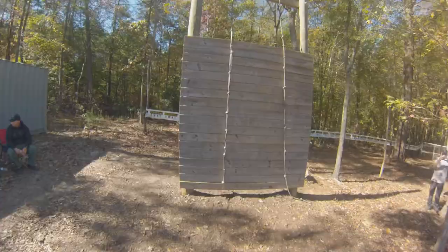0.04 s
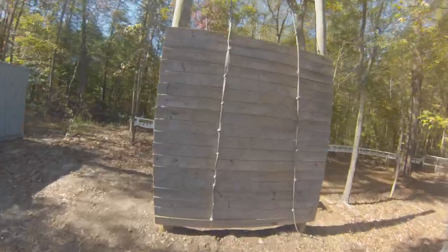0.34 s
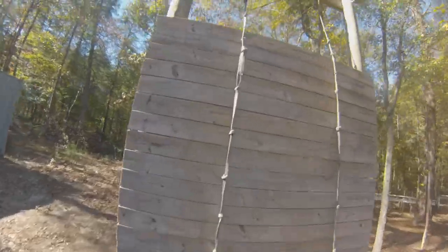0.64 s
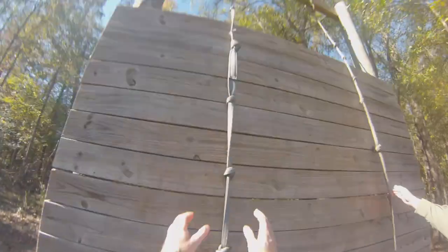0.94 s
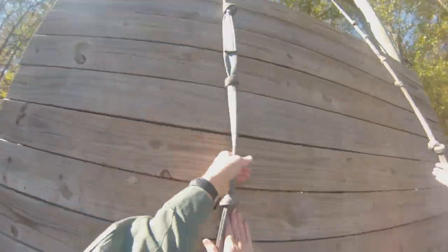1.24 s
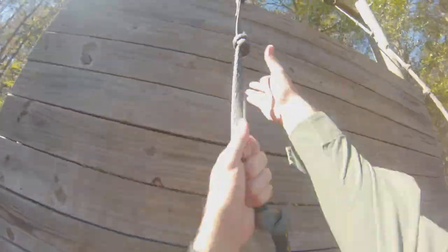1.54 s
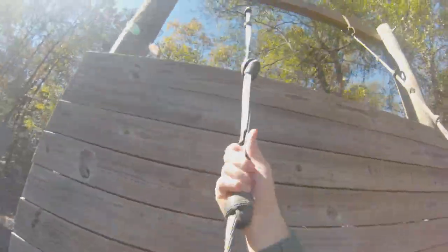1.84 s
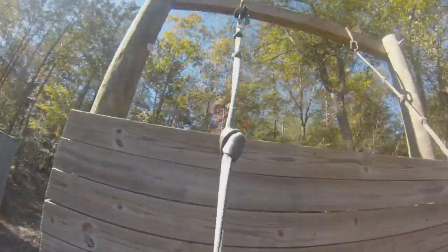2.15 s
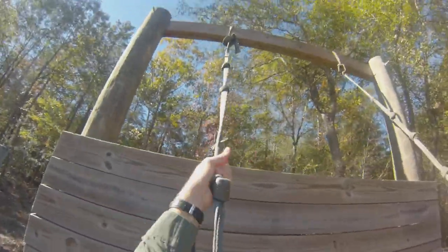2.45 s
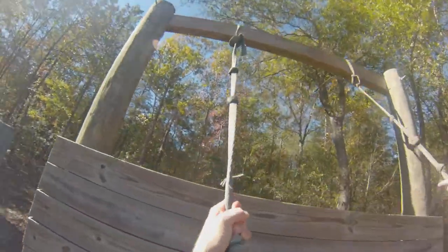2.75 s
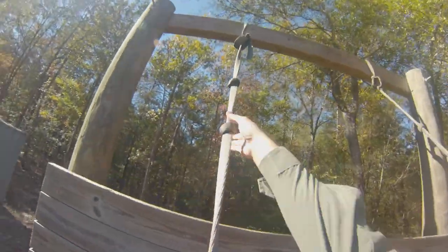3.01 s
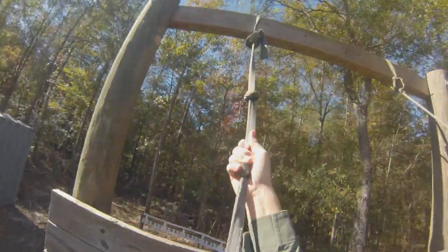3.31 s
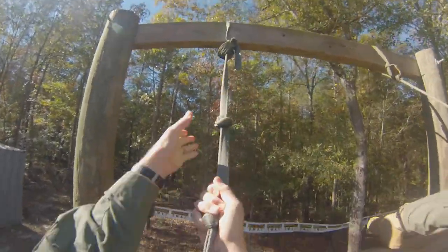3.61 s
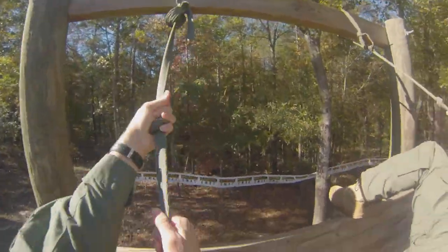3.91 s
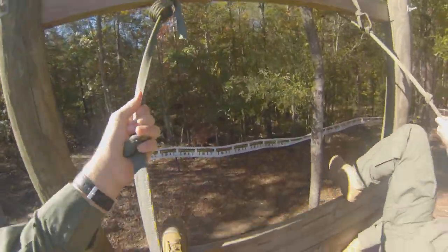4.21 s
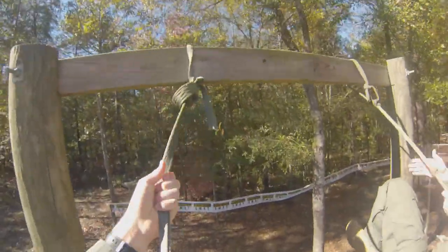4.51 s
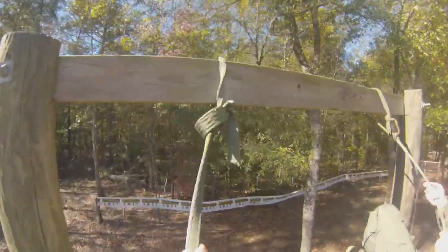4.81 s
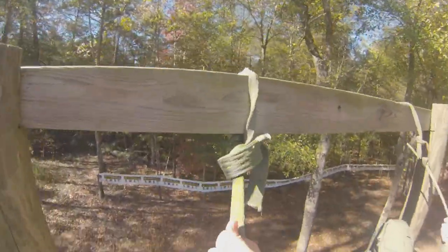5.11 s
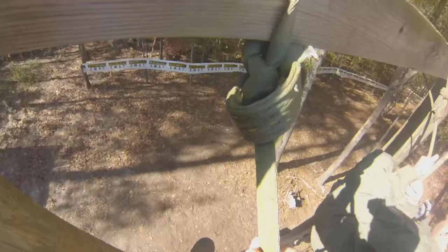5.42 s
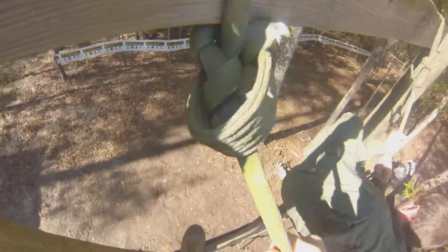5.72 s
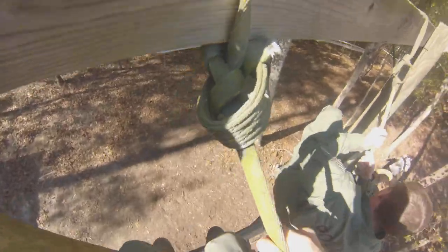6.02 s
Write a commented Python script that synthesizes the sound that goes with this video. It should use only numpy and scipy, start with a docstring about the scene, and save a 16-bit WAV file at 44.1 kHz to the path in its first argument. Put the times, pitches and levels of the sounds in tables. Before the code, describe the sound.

Low wind rumbles on a body-worn microphone throughout, outdoors with no echo, with very faint, rapid high pips behind it that pause around 3 to 4.4 seconds. In the first second a climber runs up with light taps and low pushes of air. From about 0.9 seconds a strap scrapes and a buckle knocks, and at 1 second the climber hits a plank wall: a sharp plastic crack with a deep thump, by far the loudest moment, leaving a faint, thin metallic ring. Jacket rustle, ticks and smaller knocks follow busily until about 2.2 seconds. The climb continues more quietly, with uneven cloth rubbing and occasional clicks. Dry boot taps on wood cluster between 4.2 and 4.8 seconds and return near 5.8. The rope gives a few tiny squeaks from 4.5 to 6 seconds, and rustling and wind last to the end, just after 6 seconds.

```python
"""Low wind rumbles first, with faint high pips behind it. A climber wearing a camera runs at a plank
wall, lands on it with a thump about a second in, and hauls up a rope. Each jolt pushes air at the
microphone, and the hard landing clacks the camera's plastic housing and sets a metal fitting ringing.
Jacket and strap rub on the housing, boots tap the planks, the rope squeaks and gear ticks."""
import sys
import numpy as np
from scipy import signal
from scipy.fft import rfft, irfft, next_fast_len
from scipy.io import wavfile
from scipy.ndimage import map_coordinates

SR = 44100
rng = np.random.default_rng(int(sys.argv[2]) if len(sys.argv) > 2 else 0)


def file_out(sig):
    """Save sig as 16-bit WAV at sys.argv[1]."""
    # one column per channel
    cols = np.atleast_2d(sig).T
    # limit, then scale
    lim = np.clip(cols, -1, 1)
    pcm = np.round(lim * 32767).astype(np.int16)
    wavfile.write(sys.argv[1], SR, pcm)


N = 275819

# Wind at the microphone. Each row: time in seconds, level in dB.
WIND_LEVELS = [(0.0, -35.5), (0.15, -38.5), (0.27, -51), (0.54, -33.5), (0.65, -48), (0.8, -34),
               (1.6, -38.5), (2.5, -37), (3.5, -40), (4.8, -40), (5.1, -45), (5.25, -39), (5.6, -48),
               (5.8, -40), (6.25, -40)]
# The tone of each noise. Each row: frequency in Hz, relative level in dB.
RUMBLE_TONE = [(8, -14), (16, 2), (28, -4), (45, -5.5), (60, -15), (75, -25.5), (100, -35.5), (200, -55.5),
               (500, -96.5)]
AIR_TONE = [(60, 19), (150, 5), (300, 4), (600, 0), (950, -4.5), (1400, -2), (1900, -9), (2330, -5),
            (3000, -10), (5700, -10.5), (8500, -15), (10300, -11.5), (12500, -17.5), (13400, -28)]
RUSTLE_TONE = [(400, -26), (730, 0.5), (950, -12), (1400, 0), (1900, -6), (2330, -2), (2650, -9),
               (3000, -14.5), (3450, -18.5), (3850, -14.5), (4800, -26.5), (8000, -24), (12000, -38),
               (15000, -46.5)]
RUB_TONE = [(60, 3), (130, 5.5), (210, 0), (300, -1.5), (580, -7.5), (730, -9.5), (950, -35.5), (1800, -53)]
SCRAPE_TONE = [(70, -10), (150, 7.5), (260, 1.5), (580, 2), (730, 0), (950, -10.5), (1350, -4), (1900, -8),
               (2330, -3.5), (3000, -23), (3850, -24), (5000, -31), (12000, -40), (15000, -94.5)]
TICK_TONE = [(500, -30), (1500, 1), (2500, 0), (3900, 1.5), (6000, -12), (9000, -12), (14000, -29)]
# When the pips sound. Each row: start and end in seconds.
PIP_TIMES = [(0, 2.85), (4.37, 6.25)]
# The pitches in a pip. Each row: pitch in Hz, width in Hz, relative level in dB.
PIP_BANDS = [(5700, 400, -2), (10230, 900, -1), (12350, 500, -6)]
# How much the body stirs the jacket. Each row: time in seconds, relative level in dB.
BODY_EFFORT = [(0.0, -74), (0.65, -87.5), (0.78, -73.5), (0.87, -61), (1.03, -70), (1.27, -60.5),
               (1.38, -70.5), (1.6, -79), (2.1, -72), (2.9, -79.5), (3.8, -75), (4.1, -79), (4.65, -72),
               (5.05, -80.5), (6.25, -76.5)]
# Arm and leg moves. Each row: middle and half length in seconds, relative rustle and rub in dB.
LIMB_MOVES = [(0.467, 0.057, -75.5, -63.5), (1.12, .028, -63.5, -53), (1.209, .035, -63, -54),
              (1.318, 0.022, -59.5, -58), (1.478, 0.081, -66, -63), (1.661, 0.04, -66, -69),
              (1.767, 0.043, -68, -61.5), (1.906, 0.017, -70.5, -69), (2.096, 0.061, -65, -63),
              (2.2, 0.023, -70.5, -65), (2.415, .02, -66, -62), (2.481, .022, -67, -67.5),
              (2.594, 0.084, -69.5, -66.5), (2.73, 0.018, -75.5, -74), (3.069, 0.032, -70.5, -79),
              (3.192, 0.048, -76.5, -63), (3.349, 0.039, -70, -62), (3.522, 0.011, -80.5, -61.5),
              (3.83, 0.026, -75.5, -66), (4.073, 0.017, -91, -63.5), (4.224, 0.083, -71.5, -73),
              (4.382, 0.055, -72.5, -64), (4.661, 0.022, -78, -65.5), (4.758, 0.023, -73, -65.5),
              (4.823, 0.025, -73.5, -65.5), (5.193, 0.031, -73, -71.5), (5.495, 0.02, -69.5, -72),
              (5.744, 0.012, -76.5, -66.5), (5.976, 0.059, -71, -66.5), (6.255, 0.023, -64, -65)]
# Quick drags of the strap. Each row: middle in seconds, level in dB, half length in seconds.
STRAP_DRAGS = [(0.878, -41, 0.012), (0.927, -44, 0.014), (0.947, -53.5, 0.022), (0.982, -37, 0.0096),
               (1.113, -58.5, 0.0051), (1.125, -65, 0.0053), (1.187, -63, 0.0053), (2.648, -62, 0.0067),
               (3.134, -64.5, 0.011), (3.227, -65, 0.0067), (3.464, -63.5, 0.0082), (5.607, -64.5, 0.0045)]
# Small ticks of gear. Each row: start in seconds, peak in dB.
GEAR_TICKS = [(.1465, -49), (1.1109, -52), (1.122, -46), (1.2745, -53), (1.2775, -51), (1.7065, -60),
              (2.0662, -61), (4.2423, -62), (4.478, -62), (5.9328, -52)]
# The rope tightening. Each row: middle in seconds, level in dB, pitch in Hz, half length in seconds.
ROPE_SQUEAKS = [(4.535, -69, 1430, 0.0043), (5.334, -70.5, 1563, 0.0083), (5.3478, -55, 1513, 0.0045),
                (5.442, -63.5, 1426, 0.0028), (6.066, -68, 1340, 0.0037)]
# Taps on the planks. Each row: start in seconds, level in dB, pitch in Hz, seconds to fade by 60 dB.
PLANK_TAPS = [(0.1465, -54, 1630, 0.022), (0.269, -63.5, 2240, .08), (0.3674, -59, 2100, 0.022),
              (0.703, -66.5, 2204, 0.062), (2.802, -63, 1500, 0.075), (2.9554, -61.5, 1700, 0.028),
              (4.2427, -52.5, 1180, 0.026), (4.356, -58, 1940, 0.03), (4.4767, -51.5, 1480, 0.038),
              (4.5995, -54.5, 1130, .1), (4.762, -56, 1270, 0.068), (5.034, -71.5, 1240, .08),
              (5.261, -64.5, 2260, .026), (5.8139, -53.5, 1530, 0.055), (5.831, -61.5, 2240, 0.048),
              (6.066, -64, 1286, 0.081)]
# How the plastic housing rings. Each row: frequency in Hz, relative level in dB.
HOUSING_TONE = [(200, -14), (410, -3.5), (580, -15.5), (760, -7), (1100, 1.5), (1850, -2.5), (2280, 5),
                (2600, -1), (3000, -25.5), (4000, -15.5), (4650, -22.5), (5400, -33), (8200, -30),
                (14000, -44)]
# Knocks on the housing. Each row: start in seconds, clack level in dB, thud level in dB.
BUCKLE_KNOCKS = [(.8808, -28, -39), (.9045, -37, -39), (.9583, -38, -41), (1.087, -57, -47),
                 (1.1997, -44, -50), (1.2765, -44, -48), (1.5469, -51, -56), (1.706, -53, -62),
                 (1.8642, -55, -61), (2.0662, -53, -62), (2.1331, -58, -59), (2.205, -60, -53),
                 (3.4526, -55, -51), (3.5818, -57, -66), (4.422, -62, -56), (4.81, -59, -56),
                 (5.558, -62, -56)]
# Jolts of the body. Each row: middle in seconds, peak in dB, rough pitch in Hz.
BODY_JOLTS = [(0.458, -23, 21.7), (0.494, -20, 27.6), (0.819, -21.5, 26.8), (0.845, -20, 37.5),
              (0.884, -22, 39.4), (.902, -27, 41.7), (.936, -17.5, 24.4), (0.9822, -7, 47.3),
              (1.011, -25.5, 35.3), (1.101, -23.5, 28.8), (1.234, -22.5, 29.8), (1.318, -20, 26.9),
              (1.477, -25, 27.54), (2.081, -28, 23.9), (3.215, -27.5, 27.3), (4.4, -31, 24.1),
              (5.929, -30, 34)]
# The metal fitting's notes. Each row: pitch in Hz, level in dB, seconds to fade by 60 dB.
FITTING_NOTES = [(2700, -68, .5), (3550, -75.5, .6)]
# Meeting the wall. Two values: time of the blow in seconds, seconds until the housing bounces.
LANDING_TIMES = (.9745, .00134)


def amp(db):
    """Turn decibels into a gain."""
    return 10 ** (np.asarray(db) / 20)


def unit(x):
    """Scale a sound to an average (rms) level of 1."""
    return x / np.sqrt(np.mean(x ** 2) + 1e-20)


def clock():
    """The time of every sample, in seconds."""
    return np.arange(N) / SR


def curves(rows):
    """Join a table's rows with straight lines: one curve for each column after the time."""
    times, *columns = np.transpose(rows)
    return [np.interp(clock(), times, column) for column in columns]


def swell(middle, half):
    """A smooth rise and fall that reaches 1 at the middle time."""
    return np.exp(-((clock() - middle) / half) ** 2)


def wobble(rate):
    """A smooth curve through `rate` random points a second."""
    return map_coordinates(rng.standard_normal(int(N * rate / SR) + 4), [clock() * rate])


def filtered(x, response):
    """Multiply each frequency in a sound by response(hz)."""
    size = next_fast_len(len(x) + SR // 4)
    return irfft(rfft(x, size) * response(np.fft.rfftfreq(size, 1 / SR)), size)[:len(x)]


def tone_gain(hz, tone):
    """The gain a tone table gives at these frequencies."""
    points_hz, db = np.transpose(tone)
    return amp(np.interp(np.log(hz + 1), np.log(points_hz), db))


def coloured(x, tone):
    """Shape a sound with a tone table, at an average level of 1."""
    return unit(filtered(x, lambda hz: tone_gain(hz, tone)))


def resonance(f, hz, width):
    """A filter shape that favours the frequencies f near hz."""
    return 1j * f * width / (hz * hz - f * f + 1j * f * width)


def add(track, start, sound):
    """Mix a short sound into the track at a start time in seconds."""
    part = track[round(start * SR):][:len(sound)]
    part += sound[:len(part)]


def slips(rate, spread_db, hiss):
    """Rubbing: about `rate` tiny, uneven slips a second over a smooth hiss."""
    sizes = rng.standard_normal(N) * amp(spread_db * np.clip(rng.standard_normal(N), -2, 2))
    slipping = rng.random(N) < rate / SR
    return unit(sizes * slipping) + hiss * rng.standard_normal(N)


def clack(size=4096):
    """One hit on the plastic housing: a sharp front, then a short ring, with a peak of 1."""
    hz = np.fft.rfftfreq(size, 1 / SR)
    # Folding the cepstrum keeps the tone but packs the energy at the start (minimum phase).
    cepstrum = irfft(np.log(tone_gain(hz, HOUSING_TONE)))
    cepstrum[1:size // 2] *= 2
    cepstrum[size // 2:] = 0
    sound = irfft(np.exp(rfft(cepstrum)))
    return sound / np.abs(sound).max()


def thud(hz=182, fade_s=0.049, rise_s=0.0014):
    """One hit on the camera's mount: a low note that dies quickly."""
    t = np.arange(4096) / SR
    return np.sin(2 * np.pi * hz * t) * amp(-60 * t / fade_s) * (1 - np.exp(-t / rise_s))


def wind(air_db=-73):
    """Wind buffets the microphone over the faint hiss of the woods."""
    level_db, = curves(WIND_LEVELS)
    rumble = coloured(rng.standard_normal(N), RUMBLE_TONE)
    air = coloured(rng.standard_normal(N), AIR_TONE)
    return amp(level_db) * rumble + amp(air_db) * air


def pips(per_second=36, scatter=0.3, half_s=0.0065, spread_db=2, level_db=-89):
    """Tiny, high pips of noise come in a fast, nearly regular stream."""
    times = np.cumsum(1 + scatter * rng.standard_normal(400)) / per_second
    sizes = amp(spread_db * rng.standard_normal(len(times)))
    beats = np.zeros(N)
    for time, size in zip(times, sizes):
        if any(start < time < end for start, end in PIP_TIMES):
            add(beats, time, [size])
    pip_shape = swell(0.02, half_s)[:SR // 25]
    pulses = signal.fftconvolve(beats, pip_shape, "same")
    bands = lambda f: sum(amp(db) * resonance(f, hz, width) ** 2 for hz, width, db in PIP_BANDS)
    return amp(level_db) * unit(filtered(pulses * rng.standard_normal(N), bands))


def jacket(rustle_db=-3.9, rub_db=-1.6, crackle_db=-8, stir_rustle_db=-1.15, stir_rub_db=-1.9):
    """Cloth stirs with effort and slides over the housing with each move; stiff creases flick it."""
    effort_db, = curves(BODY_EFFORT)
    stir = amp(effort_db + 1.5 * wobble(rate=22))
    rustle_moves = sum(amp(db) * swell(middle, half) for middle, half, db, _ in LIMB_MOVES)
    rub_moves = sum(amp(db) * swell(middle, half) for middle, half, _, db in LIMB_MOVES)
    rustle_level = np.hypot(amp(stir_rustle_db) * stir, rustle_moves)
    rub_level = np.hypot(amp(stir_rub_db) * stir, rub_moves)
    grip_db = 4.0 * wobble(rate=55)  # the cloth catches and lets go
    rustle = amp(rustle_db + grip_db) * coloured(slips(rate=2300, spread_db=-0.5, hiss=1), RUSTLE_TONE)
    rub = amp(rub_db + grip_db) * coloured(slips(rate=1100, spread_db=0.5, hiss=1), RUB_TONE)
    flicks = slips(rate=170, spread_db=2, hiss=0.1)
    creases = amp(crackle_db) * unit(signal.fftconvolve(flicks, clack())[:N])
    return rustle_level * (rustle + creases) + rub_level * rub


def strap_scrapes():
    """The strap drags over the housing in short swells."""
    drag = sum(amp(db) * swell(middle, half) for middle, db, half in STRAP_DRAGS)
    return drag * coloured(slips(rate=470, spread_db=3, hiss=0.89), SCRAPE_TONE)


def gear_ticks(fade_s=0.008):
    """The gear clicks: bright, very short bursts of noise."""
    out, t = np.zeros(N), np.arange(SR // 20) / SR
    for start, db in GEAR_TICKS:
        click = coloured(rng.standard_normal(len(t)), TICK_TONE) * amp(-60 * t / fade_s)
        add(out, start, amp(db) * click / np.abs(click).max())
    return out


def rope_squeaks(waver=0.15, overtone_db=-27):
    """Rope fibres stick and slip in the knot, making brief notes with a shaky pitch."""
    out = np.zeros(N)
    phase_per_hz = 2 * np.pi * np.cumsum(1 + waver * wobble(rate=900)) / SR
    for middle, db, hz, half in ROPE_SQUEAKS:
        phase = hz * phase_per_hz
        note = unit(np.sin(phase) + amp(overtone_db) * np.sin(2 * phase))
        out += amp(db) * swell(middle, half) * note
    return out


def plank_taps(width_hz=680, muffle_hz=2700, rise_s=0.00089):
    """Boots and rope make dry, scuffing taps on the wood, muffled by the housing."""
    out, t = np.zeros(N), np.arange(SR // 5) / SR
    for start, db, hz, fade_s in PLANK_TAPS:
        muffled_wood = lambda f: resonance(f, hz, width_hz) / (1 + (f / muffle_hz) ** 8)
        scuff = unit(filtered(rng.standard_normal(len(t)), muffled_wood))
        level = amp(db - 60 * t / fade_s) * (1 - np.exp(-t / rise_s))
        add(out, start, level * scuff)
    return out


def buckle_knocks(fade_s=0.0047, muffle_hz=3000):
    """A cloth-covered buckle chatters on the housing for an instant and thuds its mount."""
    out, t = np.zeros(N), np.arange(SR // 20) / SR
    for start, clack_db, thud_db in BUCKLE_KNOCKS:
        chatter = rng.standard_normal(len(t)) * amp(-60 * t / fade_s)
        ring = signal.fftconvolve(chatter, clack())
        muffled = filtered(ring, lambda hz: 1 / (1 + (hz / muffle_hz) ** 2))
        add(out, start, amp(clack_db) * muffled / np.abs(muffled).max())
        add(out, start, amp(thud_db) * thud())
    return out


def body_jolts(skew=0.23):
    """Each jolt is one low push of air: a quick swing in and a slower rebound."""
    out = np.zeros(N)
    for middle, db, hz in BODY_JOLTS:
        phase = np.pi * hz * (clock() - middle)
        lopsided = phase * (1 - skew * np.tanh(phase))
        out -= amp(db) * (1 - 2 * lopsided ** 2) * np.exp(-lopsided ** 2)
    return out


def metal_fitting():
    """The landing sets a metal part of the gear ringing with a thin sound that lingers."""
    out, t = np.zeros(N), np.arange(SR // 2) / SR
    for hz, db, fade_s in FITTING_NOTES:
        add(out, LANDING_TIMES[0], amp(db - 60 * t / fade_s) * np.sin(2 * np.pi * hz * t))
    return out


def landing(blow_db=-10, bounce_db=-14, thud_db=-18, skid_db=-43, skid_hz=4700, skid_delay_s=0.0068):
    """The housing hits and bounces in a double crack, then skids over ribbed webbing with a tiny zip."""
    out = np.zeros(N)
    start, bounce_delay = LANDING_TIMES
    add(out, start, amp(blow_db) * clack() + amp(thud_db) * thud())
    add(out, start + bounce_delay, amp(bounce_db) * clack())
    speed = swell(start + skid_delay_s, half=0.003)
    rib_phase = 2 * np.pi * np.cumsum(skid_hz * speed ** 0.52) / SR  # faster skid, higher pitch
    grit = 0.9 * coloured(rng.standard_normal(N), TICK_TONE)
    skid = np.sin(rib_phase) + 0.25 * np.sin(2 * rib_phase) + grit
    return out + amp(skid_db) * speed * skid


def scene():
    """Add everything into one channel, out in the open air with no echo."""
    background = wind() + pips()
    climbing = jacket() + strap_scrapes() + gear_ticks() + rope_squeaks() + plank_taps()
    impacts = buckle_knocks() + body_jolts() + metal_fitting() + landing()
    return (background + climbing + impacts)[None]


def record(dry):
    """The sound eases in and out, and the camera cuts off the very highest treble."""
    top_hz = 15800
    fades = signal.windows.tukey(N, 0.003)
    return np.array([filtered(channel * fades, lambda hz: hz < top_hz) for channel in dry])


dry = scene()
out = record(dry)
file_out(out)
```